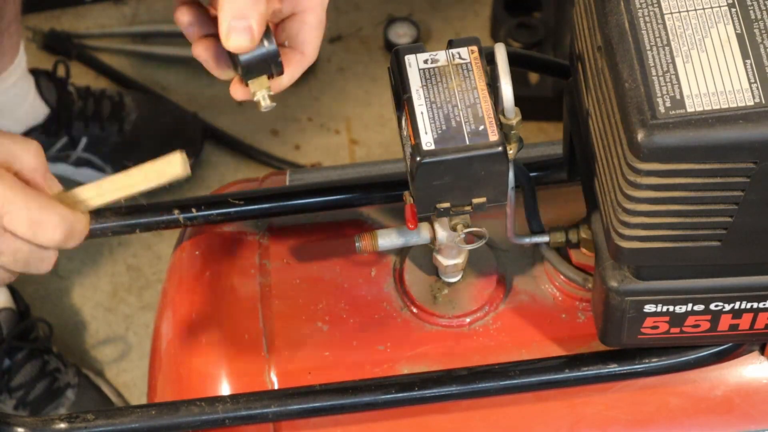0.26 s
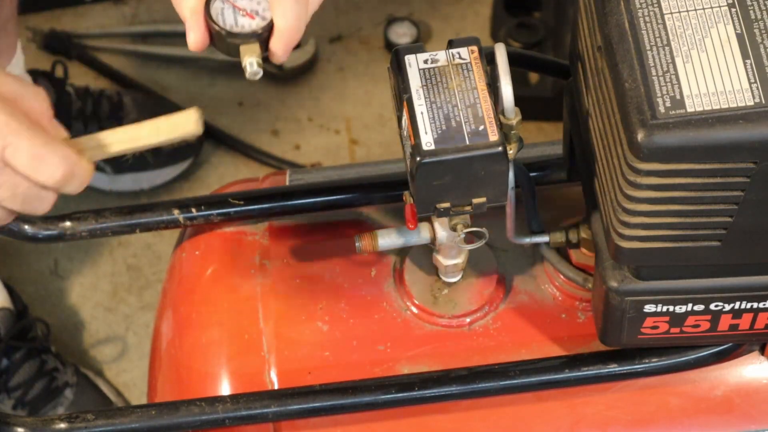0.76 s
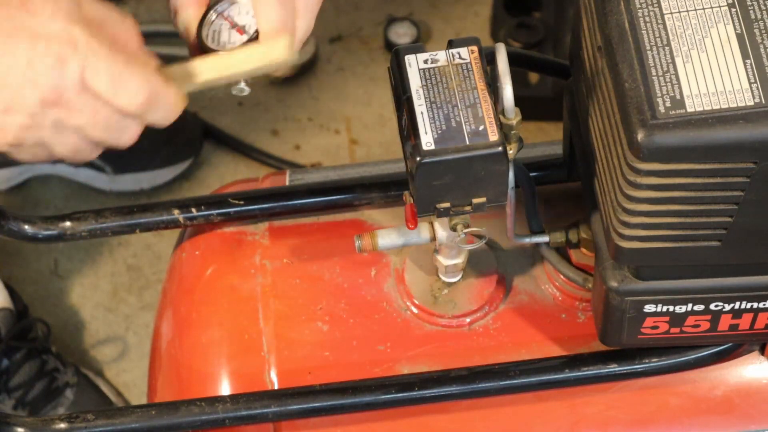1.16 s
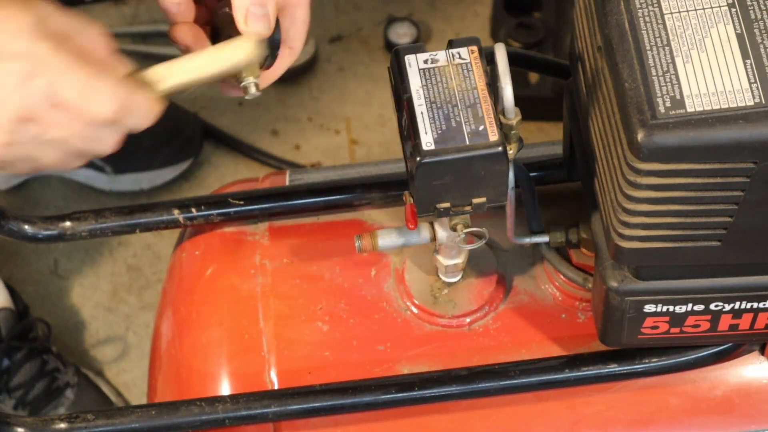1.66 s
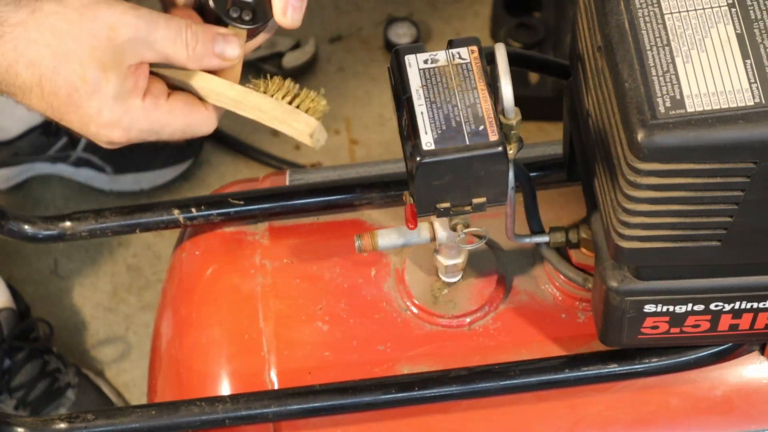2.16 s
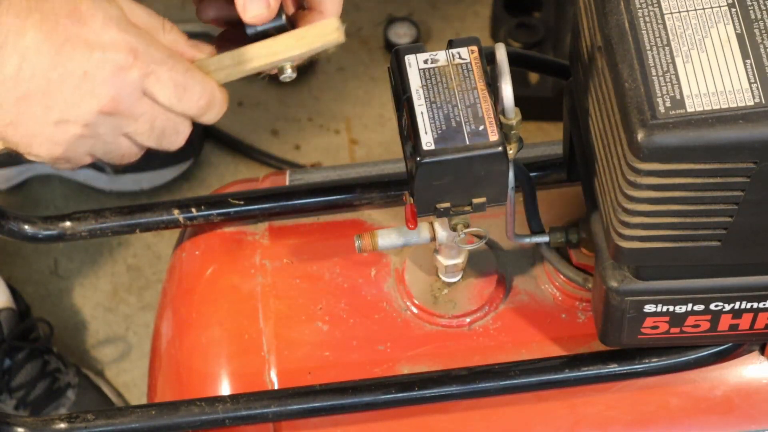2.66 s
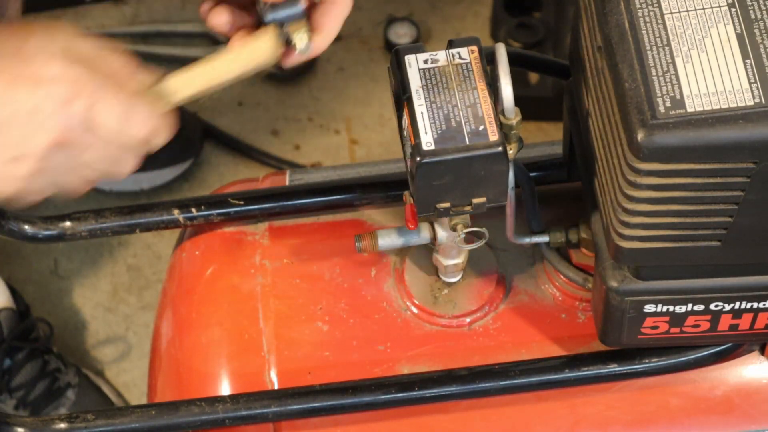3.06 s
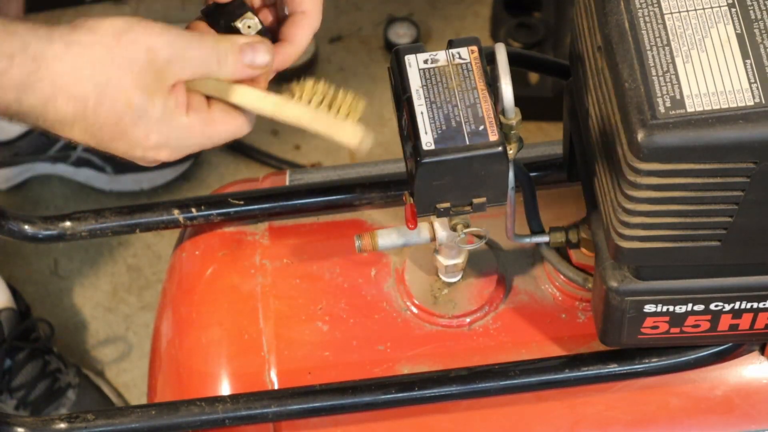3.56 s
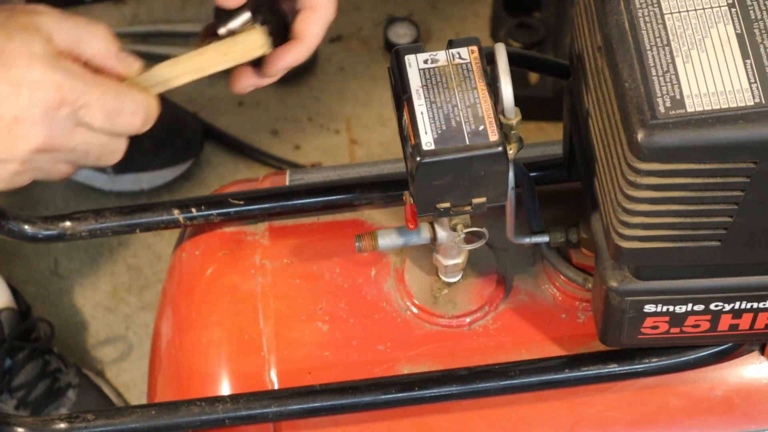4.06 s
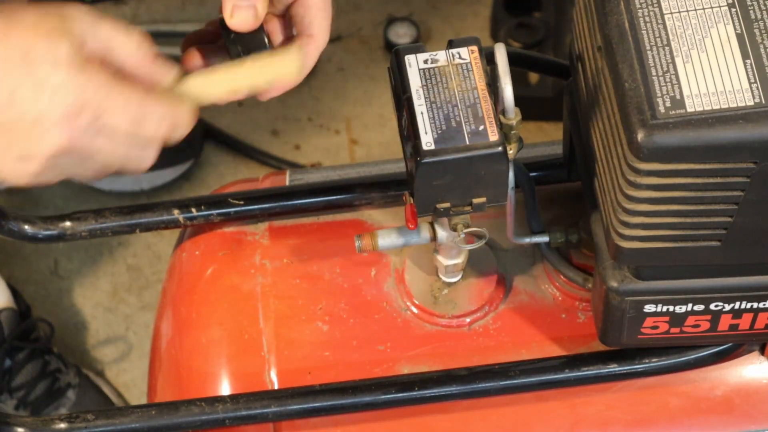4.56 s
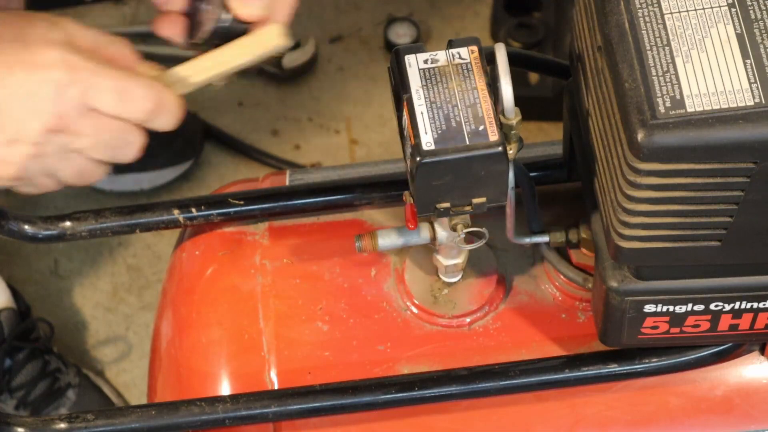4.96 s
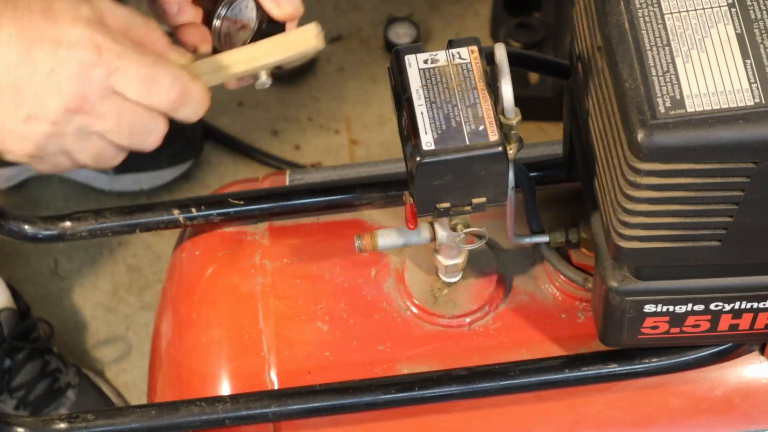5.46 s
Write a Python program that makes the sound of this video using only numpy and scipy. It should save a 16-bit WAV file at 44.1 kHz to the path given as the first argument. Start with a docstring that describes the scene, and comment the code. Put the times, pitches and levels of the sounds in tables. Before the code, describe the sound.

Close to the microphone in a workshop, a wire brush scrubs the brass stem of a hand-held gauge. Short, bright rasping strokes come about six a second, pause near two seconds with faint wire flicks and squeaks, resume unevenly with a sharp wooden knock, then settle into steady, more ringing scrubbing. A low rumble and faint motor hum lie underneath.

```python
"""Workshop, close to the microphone: a wire brush scrubs the brass stem of a hand-held pressure gauge.
Throughout, still air, a low rumble and a steady hum. Quick strokes to 2 s, each a catch, a rasp and a ring.
Then a pause with stray wires and faint squeaks; from 2.7 s broken, partly weak strokes; from 3.8 s steady again.
Now and then the wooden handle knocks the gauge. Filtered noise and random slips drive resonances;
the room answers each contact with early echoes and a short tail."""
import sys
import numpy as np
from scipy import signal
from scipy.fft import rfft, irfft
from scipy.io import wavfile
from scipy.ndimage import uniform_filter1d

SR = 44100
rng = np.random.default_rng(int(sys.argv[2]) if len(sys.argv) > 2 else 0)


def store_pcm(level_fs):
    """Save levels as 16-bit WAV."""
    pcm = np.round(np.clip(level_fs, -1, 1) * 32767).astype(np.int16)
    wavfile.write(sys.argv[1], SR, np.atleast_2d(pcm).T)


N = 251811   # length [samples]
SLOT = np.arange(SR // 4) / SR   # the time that one contact may take [s]


def from_db(db):
    """Level [dB] to amplitude."""
    return 10 ** (np.asarray(db) / 20)


def rms_one(x):
    """Scale a signal to rms 1."""
    return x / np.sqrt(np.mean(x ** 2) + 1e-20)


def add(track, s, sound):
    """Lay a sound into the track at time s."""
    start = max(round(s * SR), 0)
    track[start:start + len(sound)] += sound[:len(track) - start]


def coloured(x, spectrum):
    """Weight a steady signal by a spectrum, falling away below its first point; rms 1."""
    hz, db = np.transpose(spectrum)
    f = np.maximum(np.arange(len(x) // 2 + 1) * SR / len(x), 1)
    low_cut = np.minimum(f / hz[0], 1) ** 2
    gain = from_db(np.interp(np.log(f), np.log(hz), db)) * low_cut
    return rms_one(irfft(rfft(x) * gain, len(x)))


def varied(spectrum):
    """Each stroke bends other wires, so it has a colour of its own."""
    return [(hz, db + rng.normal(0, .9)) for hz, db in spectrum]


def resonate(x, hz, width):
    """One resonance of a given width [Hz], gain about 1 on top."""
    r = np.exp(-np.pi * width / SR)
    zeros = np.array([1, 0, -1]) * (1 - r * r) / 2
    poles = [1, -2 * r * np.cos(2 * np.pi * hz / SR), r * r]
    return signal.lfilter(zeros, poles, x + 1e-18)


def narrow_noise(hz, width):
    """Noise twice through one resonance, run in for a second; rms 1."""
    once = resonate(rng.standard_normal(N + SR), hz, width)
    return rms_one(resonate(once, hz, width)[SR:])


def ring(force, modes, envelope):
    """A body rings under a force that follows the envelope, and carries the envelope's energy."""
    out = sum(from_db(db) * resonate(force * envelope, hz, width) for hz, width, db in modes)
    return rms_one(out) * np.sqrt(np.mean(envelope ** 2))


def slips(per_s, spread_db):
    """Wire tips let go at random moments, with uneven strength."""
    count = len(SLOT)
    sizes = from_db(spread_db * np.minimum(rng.exponential(1, count), 4)) * rng.choice([-1, 1], count)
    return sizes * (rng.random(count) < per_s / SR)


def blow(fade, rise):
    """The level of a contact builds up in the rise time [s], then falls ever faster."""
    return np.minimum(SLOT / rise, 1) * np.exp(-(SLOT / fade) ** 2)


# still air: (frequency [Hz], relative density [dB])
AIR_SPECTRUM = [(15, -26), (25, -10.5), (87, -3.5), (301, -8.5), (363, -10.5), (416, -12.5), (754, -12),
                (911, -8), (1020, -11.5), (1330, -14.5), (1940, -19), (2220, -18.5), (2760, -19),
                (14400, -27), (16000, -28.5)]
# low rumble: (frequency [Hz], resonance width [Hz], level [dB])
RUMBLE_BANDS = [(90.5, 22.6, -60), (845, 79, -74)]
# distant motor: (frequency [Hz], level of the steady tone [dB])
MOTOR_HUM = [(237.5, -69), (357.5, -66), (477, -75)]


def background(air_db=-55.5, waver=0.24):
    """Still air and rumble are filtered noise; a distant motor hums in sines with a little narrow noise."""
    t = np.arange(N) / SR
    out = from_db(air_db) * coloured(rng.standard_normal(N), AIR_SPECTRUM)
    for hz, width, db in RUMBLE_BANDS:
        out += from_db(db) * narrow_noise(hz, width)
    for hz, db in MOTOR_HUM:
        tone = np.sqrt(2) * np.sin(2 * np.pi * hz * t)
        out += from_db(db) * (tone + waver * narrow_noise(hz, width=25.0))
    return out


# early echoes from tank, floor and walls: (delay [s], level [dB])
EARLY_ECHOES = [(.0065, -39.5), (.013, -20), (.037, -28), (.046, -19)]
# diffuse tail: (frequency [Hz], level [dB], time to fall by 60 dB [s])
ROOM_TAIL = [(300, -19, 0.63), (1020, -9, 0.26), (2470, -10.5, 0.24), (5000, -21, 0.33), (8400, -14, 0.18),
             (14900, -36.5, 0.12)]


def workshop(x, build_s=0.042):
    """The room answers with a few early echoes and a diffuse tail, built from bands of fading noise."""
    t = np.arange(SR * 3 // 5) / SR
    room_hz, room_db, room_t60 = np.transpose(ROOM_TAIL)
    edges = np.geomspace(150, 17000, 11)
    response = np.zeros(len(t))
    for low, high in zip(edges, edges[1:]):
        hz = np.sqrt(low * high)
        t60 = np.interp(hz, room_hz, room_t60)
        fade = from_db(-60 * t / t60) * np.minimum(t / build_s, 1)
        tail = rng.standard_normal(len(t)) * fade / np.sqrt(np.sum(fade ** 2))
        band = signal.butter(2, [low, high], "band", fs=SR, output="sos")
        response += from_db(np.interp(hz, room_hz, room_db)) * signal.sosfilt(band, tail)
    soft_click = signal.lfilter(*signal.butter(1, 7000, fs=SR), SLOT == 0)
    for delay, db in EARLY_ECHOES:
        add(response, delay, from_db(db) * soft_click)
    return signal.fftconvolve(x, response)[:N]


# faint squeaks: (time [s], length [s], start pitch [Hz], end pitch [Hz], peak level [dB])
SQUEAK_GLIDES = [(2.255, .055, 7650, 7400, -60), (2.49, 0.038, 2260, 2210, -57),
                 (3.357, 0.0094, 4230, 4450, -55), (3.536, .023, 5150, 5940, -52.5),
                 (3.678, .027, 5900, 4960, -51)]


def squeaks(waver=0.04):
    """Short gliding tones, rough and unsteady in pitch."""
    out = np.zeros(N)
    for s, length, start_hz, end_hz, db in SQUEAK_GLIDES:
        along = np.minimum(SLOT / length, 1)
        unsteady = rms_one(uniform_filter1d(rng.standard_normal(len(SLOT)), size=40))
        hz = (start_hz + (end_hz - start_hz) * along) * (1 + waver * unsteady)
        tone = np.sin(2 * np.pi * np.cumsum(hz) / SR)
        add(out, s, from_db(db) * np.sin(np.pi * along) * tone)
    return out


# hollow gauge case and handle: (frequency [Hz], width [Hz], relative level [dB])
CASE_MODES = [(697.5, 25, -4), (836, 24, -6.5), (902, 57, 2), (945, 36, -5.5), (1240, 44, -21)]


def hollow_case(force, envelope):
    """The hollow case and the handle answer a force in a few low resonances."""
    return ring(force, CASE_MODES, envelope)


# brass stem and gauge works: (nominal frequency [Hz], width [Hz], relative level [dB])
BRASS_MODES = [(2620, 22, -48), (2944, 42, -11), (3510, 55, -1), (3746, 62, -5), (4450, 58, -9),
               (4938, 42, 10.5), (6830, 100, -12), (7620, 75, -9), (9040, 90, -13), (10740, 190, -15),
               (11670, 52, -13)]


def touched_brass(low_db, middle_db):
    """The place of contact favours some modes; the fingers shift and change them a little."""
    hz, width, db = np.transpose(BRASS_MODES)
    favour = np.interp(np.arange(len(hz)), [3, 4, 5], [low_db, middle_db, 0])   # by mode number
    shift, gain = rng.standard_normal((2, len(hz)))
    return np.transpose([hz * (1 + .003 * shift), width, db + favour + gain])


# hiss of the wire tips: (frequency [Hz], relative density [dB])
HISS_SPECTRUM = [(250, -7), (500, -9), (1000, -16.5), (1600, -10.5), (2400, -37), (5500, 0), (7800, -1),
                 (10000, -1), (12000, 1)]


def wire_hiss(force, top_hz=14300):
    """The hiss of the wire tips thins out at the very top."""
    lowpass = signal.butter(3, top_hz, fs=SR, output="sos")
    return signal.sosfilt(lowpass, coloured(force, varied(HISS_SPECTRUM)))


# rasp over the thread, also in the strokes: (frequency [Hz], relative density [dB])
RASP_SPECTRUM = [(1200, -53), (1700, -12), (2300, -1), (2900, -1), (3700, 2.5), (4800, 7), (5600, 0),
                 (7000, -9.5), (12000, -31)]
# stray wires flicking the brass: (time [s], fade time [s], level [dB])
STRAY_WIRES = [(0.397, 0.0029, -36.5), (2.243, .006, -51), (2.262, .061, -53.5), (2.344, 0.0064, -43.5),
               (2.427, .016, -54), (2.441, 0.011, -42), (2.539, .014, -50.5), (3.273, .0054, -48),
               (3.589, .007, -51)]


def flicks(ring_db=-5.5, rasp_db=-9.5, hiss_db=-16.0, low_db=12.0):
    """A few wires graze the brass between strokes: random slips scratch and ring it."""
    out = np.zeros(N)
    for s, fade, db in STRAY_WIRES:
        force, contact = slips(per_s=4200, spread_db=-1.0), blow(fade, rise=0.00092)
        scratch = from_db(rasp_db) * coloured(force, RASP_SPECTRUM) + from_db(hiss_db) * wire_hiss(force)
        brass = from_db(ring_db) * ring(force, touched_brass(low_db, middle_db=-5.0), contact)
        add(out, s, from_db(db) * (contact * scratch + brass))
    return out


def dispersed(x, lag_s):
    """Bending waves carry the treble faster; lag_s is the delay at 1 kHz."""
    f = np.arange(len(x) // 2 + 1) * SR / len(x)
    phase = -4 * np.pi * lag_s * np.sqrt(1000 * f)
    return irfft(rfft(x) * np.exp(1j * phase), len(x))


# dull part of a knock: (frequency [Hz], relative density [dB])
THUD_SPECTRUM = [(260, -4.5), (450, -9), (680, 11.5), (1100, -3.5), (1900, 0), (3500, -34), (8000, -44)]
# bright part of a knock: (frequency [Hz], relative density [dB])
CLACK_SPECTRUM = [(900, -39), (1300, -23.5), (1700, -8.5), (2250, 3), (3100, -0.5), (4300, 5), (6000, -16),
                  (10000, -30), (16000, -32)]
# handle against the gauge: (time [s], fade time [s], hollow case [dB], thud [dB], clack [dB])
HANDLE_KNOCKS = [ (0.621, .012, -44, -34, -35.5), (2.967, .02, -46, -43, -35),
                 (3.128, .014, -40, -33.5, -21.3), (3.430, .012, -42, -56, -62),
                 (3.620, .011, -40, -48, -58), (4.844, .014, -39.5, -66, -46),
                 (5.091, 0.004, -36, -27.5, -42), (5.423, 0.0074, -39.5, -38.5, -25)]
# only a hard clack rings the brass much: clack [dB], its ring [dB], ring per clack [dB/dB]
HARD_CLACK_DB, HARD_RING_DB, RING_PER_CLACK = -21.3, -17, 1.9


def knocks(low_db=-7.0, middle_db=15.0):
    """The wooden back of the brush hits the gauge: a thud, a hollow tock, a clack and a short ring."""
    out = np.zeros(N)
    for s, fade, case_db, thud_db, clack_db in HANDLE_KNOCKS:
        ring_db = HARD_RING_DB + RING_PER_CLACK * (clack_db - HARD_CLACK_DB)
        wood, metal = rng.choice([-1., 1.], (2, len(SLOT)))   # dense chatter on either side of the contact
        contact = blow(fade, rise=0.00078)
        thud = from_db(thud_db) * blow(fade * 0.48, rise=0.0015) * coloured(wood, THUD_SPECTRUM)
        clack = from_db(clack_db) * contact * coloured(wood, CLACK_SPECTRUM)
        case = from_db(case_db) * hollow_case(metal, contact)
        brass_drive = blow(fade * 0.96, rise=0.0069)
        brass = from_db(ring_db) * ring(metal, touched_brass(low_db, middle_db), brass_drive)
        add(out, s, dispersed(thud + clack, lag_s=0.001022) + case + brass)
    return out


# bent wires: middle pitch [Hz], width [Hz], pitch share that varies by stroke
TWANG_HZ, TWANG_WIDTH_HZ, TWANG_SCATTER = 4600, 450, .06


def twang(level_db, fade_s=.028):
    """The wires that caught first spring free and buzz at a pitch of their own."""
    hz = TWANG_HZ * (1 + TWANG_SCATTER * rng.standard_normal())
    buzz = slips(per_s=2500, spread_db=2.0)
    return from_db(level_db) * ring(buzz, [(hz, TWANG_WIDTH_HZ, 0)], blow(fade_s, rise=.003))


def tufts(depth_db):
    """The wires stand in tufts, which meet the thread a few milliseconds apart."""
    moments = np.arange(0, SLOT[-1], .003)
    return from_db(depth_db * np.interp(SLOT, moments, rng.standard_normal(len(moments))))


GRAZE_S = .015   # the first wires touch this long before a stroke lands


def pressure(length, crest, edge_db, attack, release):
    """The first wires graze, the rest land, bend to their greatest pressure, ease and slide off."""
    t = SLOT - GRAZE_S
    bend = np.interp(t / length, [0, np.clip(crest, .05, .95), 1], [-1, 0, 1])
    landing = (1 + np.tanh(t / attack - 1 / 2)) / 2
    sliding_off = np.exp(-np.maximum(t - length, 0) / release)
    return from_db(edge_db * bend ** 2) * landing * sliding_off


# the gauge turns in the hand, the wires meet other spots: (time [s], brass ring [dB], middle mode [dB])
CONTACT_SPOTS = [(0.1, -6.5, -14), (0.3, -2, -13), (0.8, -23, -4), (1.35, -21, 3), (1.65, -11, 0),
                 (2.7, -10, -5), (3.0, -5, 5), (3.6, 2.5, 9), (3.85, -2, 10), (4.2, 0.5, 6), (4.85, -3, 12),
                 (5.01, -12, 4), (5.06, 5, 9), (5.25, -1, 16), (5.7, -1, 13)]


def contact_at(s):
    """How freely the brass rings at time s, and how much its middle mode is favoured."""
    times, ring_db, middle_db = np.transpose(CONTACT_SPOTS)
    return np.interp(s, times, ring_db), np.interp(s, times, middle_db)


# brush strokes: (time [s], length [s], force against an ordinary stroke [dB], first catch [dB])
BRUSH_STROKES = [ (0.091, 0.056, 0.5, 14.5), (0.258, 0.046, -.3, 9), (0.429, 0.037, 1.5, 9),
                 (0.589, .052, .5, 5), (0.757, 0.056, -2, 12), (0.92, 0.055, -2, 17),
                 (1.071, 0.053, -1.3, 17), (1.23, 0.053, -.3, 14), (1.398, 0.059, -.8, 13),
                 (1.602, .044, 0, 18), (1.784, .048, -2, 21), (1.956, 0.052, -2, 13),
                 (2.734, 0.049, -7.5, 13.5), (2.799, 0.034, -15, 0), (2.935, 0.049, 3, 11),
                 (3.096, .052, 4, 8), (3.425, 0.029, -18, 4), (3.619, 0.039, -23, 13),
                 (3.833, 0.043, -1.3, 14), (3.972, .038, 2, 5.5), (4.099, 0.018, -2.5, 5),
                 (4.128, .032, -9.5, 6), (4.238, .037, 0, 4), (4.377, .047, 1, 5), (4.527, .038, -.3, 10),
                 (4.663, .041, 2, 18), (4.825, 0.056, 1.7, 16), (5.005, 0.015, -10.5, -1),
                 (5.022, 0.059, -17, 0), (5.062, .045, -1.5, 4), (5.239, .039, -.7, 10),
                 (5.397, 0.046, 2, 14), (5.542, .044, 1.2, 14), (5.693, 0.042, .3, 14)]
HISS_DB, RASP_DB, RING_DB = -33, -38.3, -31   # an ordinary stroke on the bare stem
RASP_FOLLOWS, RING_FOLLOWS = 0.67, 0.56   # dB per dB of force
RASP_YIELDS = .09   # dB of rasp lost per dB of ring gained
CREST_SHARE, CREST_PER_DB = .76, .022   # pressure peaks this far into a soft stroke, earlier after a hard catch
LOW_MODES_DB = 3.5   # how much the wires favour the lower brass modes
TWANG_DB, TWANG_PER_CATCH = -48.5, .5   # at ordinary force without a catch; dB per dB of catch


def brushing(catch_s=0.005, case_db=-19.5, ring_share=0.74):
    """Fine slips hiss; coarse ones on the thread rasp and ring the brass and the case. All grow with the force."""
    out = np.zeros(N)
    for s, length, force_db, catch_db in BRUSH_STROKES:
        spot_db, middle_db = contact_at(s)
        hiss_db = HISS_DB + force_db
        rasp_db = RASP_DB + RASP_FOLLOWS * force_db - RASP_YIELDS * spot_db
        ring_db = RING_DB + RING_FOLLOWS * force_db + spot_db
        crest = CREST_SHARE - CREST_PER_DB * catch_db
        clumps = tufts(depth_db=1.2)
        # straight wires catch hardest
        catch = from_db(catch_db * np.exp(-((SLOT - GRAZE_S) / catch_s) ** 4))
        slide = clumps * pressure(length, crest, edge_db=-11.0, attack=0.0032, release=0.0085)
        grip = clumps * catch * pressure(length, crest, edge_db=-8.0, attack=.0045, release=.008)
        # the bent wires stop driving the brass before they leave it
        drive = clumps * catch * pressure(length * ring_share, crest, edge_db=-7.0, attack=.004, release=.004)
        fine, coarse = slips(per_s=14000, spread_db=2.0), slips(per_s=4000, spread_db=1.5)
        hiss = from_db(hiss_db) * slide * wire_hiss(fine)
        rasp = from_db(rasp_db) * grip * coloured(coarse, varied(RASP_SPECTRUM))
        brass = from_db(ring_db) * ring(coarse, touched_brass(LOW_MODES_DB, middle_db), drive)
        case = from_db(hiss_db + case_db) * hollow_case(coarse, slide)
        add(out, s - GRAZE_S, hiss + rasp + brass + case)
        add(out, s, twang(TWANG_DB + force_db + TWANG_PER_CATCH * catch_db))
    return out


def scene():
    """Everything sits in the middle, alike in both channels; the room answers the work alone."""
    work = brushing() + knocks() + flicks() + squeaks()
    return np.tile(work + workshop(work) + background(), (2, 1))


def record(dry, cutoff_hz=15750):
    """The microphone signal loses its top in a steep lowpass."""
    lowpass = signal.ellip(12, .1, 80, cutoff_hz, fs=SR, output="sos")
    return signal.sosfilt(lowpass, dry)


dry = scene()
out = record(dry)
store_pcm(out)
```